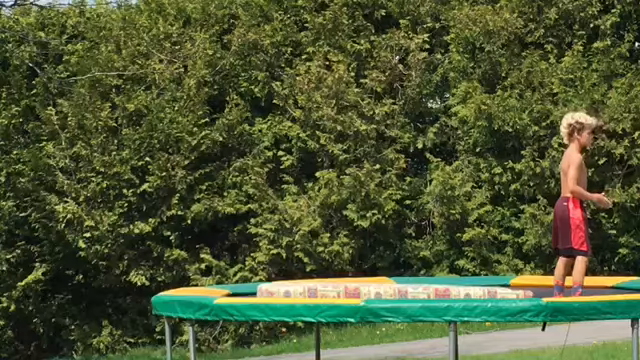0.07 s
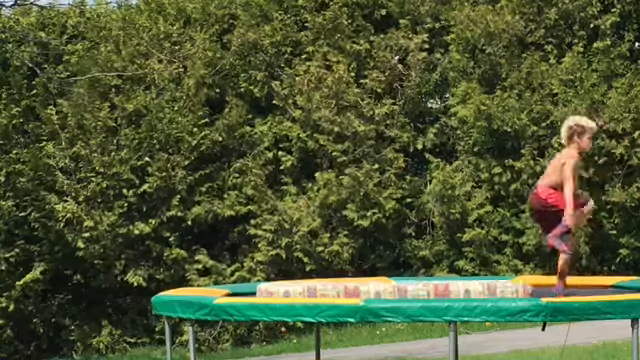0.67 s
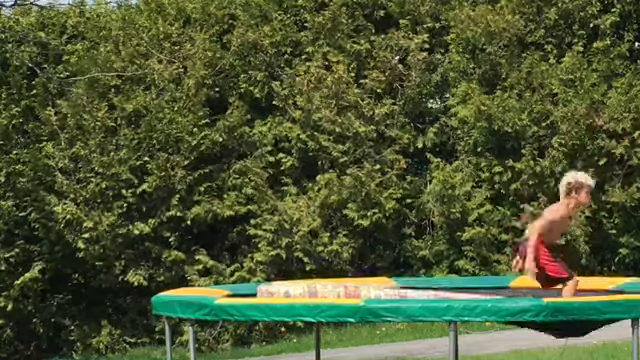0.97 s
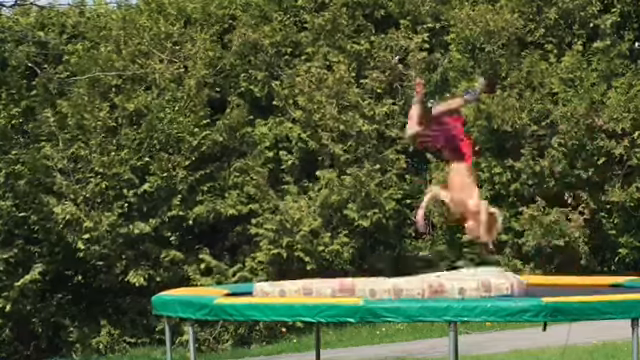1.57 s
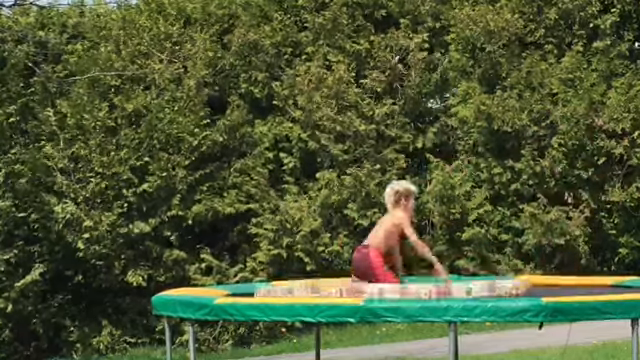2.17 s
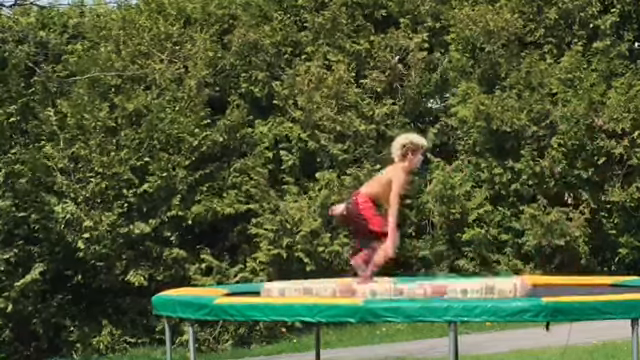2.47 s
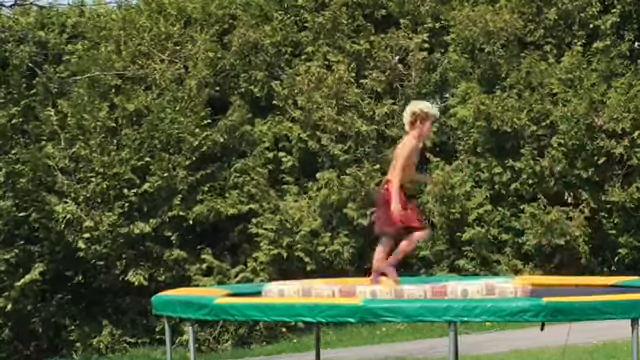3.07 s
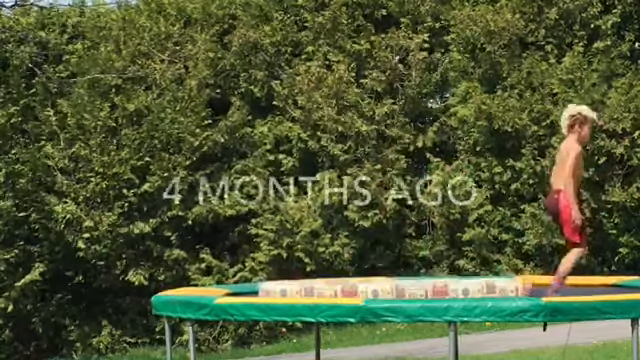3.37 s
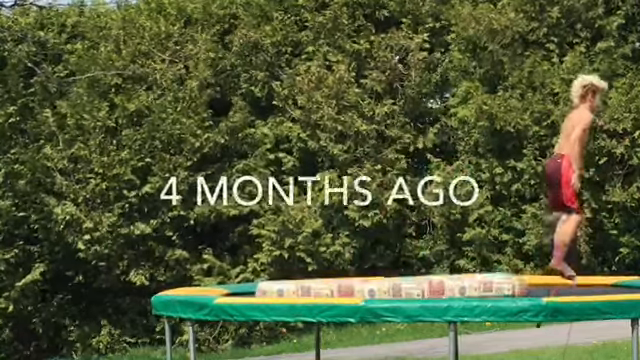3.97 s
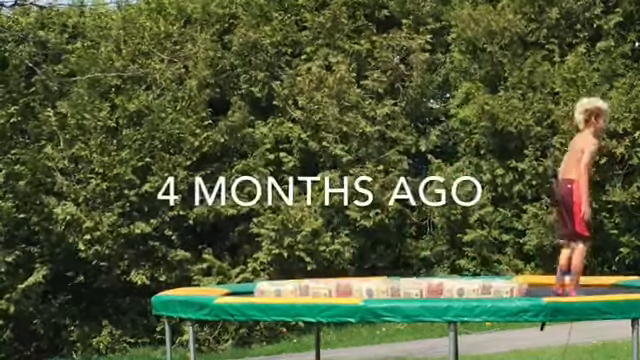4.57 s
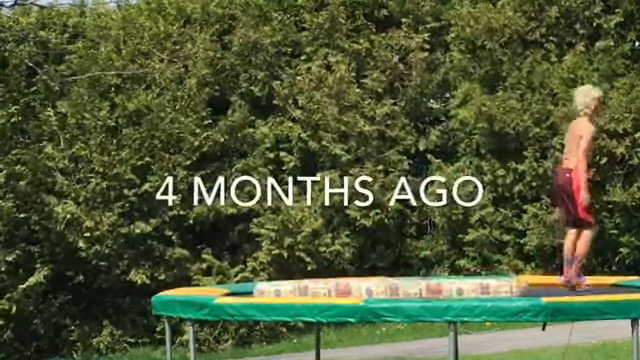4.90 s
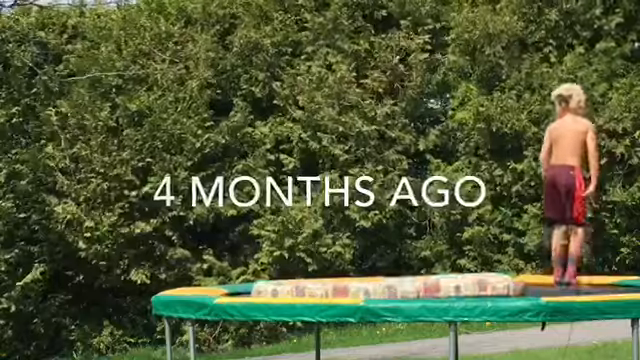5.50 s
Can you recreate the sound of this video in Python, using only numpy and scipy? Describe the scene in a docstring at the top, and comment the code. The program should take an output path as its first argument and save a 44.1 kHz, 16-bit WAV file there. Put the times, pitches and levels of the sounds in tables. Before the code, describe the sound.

A garden trampoline is heard from a few metres away, over low gusting wind, a distant droning engine, a faint machine hum, far traffic and softly hissing leaves. After a faint creak at 0.6 seconds, the steel springs rasp and squeak in a quick run from 1.1 to 1.7 seconds, thin and ringing with a slight echo. The mat gives a light pat at 1.8 seconds and a deep thump at 1.9, followed by more creaks and pats until 2.7. Very faint bird chirps come around 3 and 5 seconds, and all sound dips for an instant at 3.2. A softer thump lands at 3.7 seconds. The engine drone, now lower, swells between 4 and 5 seconds under scattered creaks and a light pat. From 5.1 to 5.5 seconds comes a cluster of deep, hollow thumps with brief creaks, the loudest at 5.4.

```python
"""Steel springs rasp and ring as a child bounces and flips on a garden trampoline some metres away. The springs
stick and slip on their hooks; the mat gives light pats and dull thumps that fall in pitch. A few birds chirp
from the hedge behind, which also echoes the springs. In the background are a droning engine, a humming machine,
wind, far traffic and a soft hiss. The whole sound dips briefly once."""
import sys
import numpy as np
from scipy import signal
from scipy.fft import rfft, irfft
from scipy.io import wavfile
from scipy.ndimage import uniform_filter1d

SR = 44100
rng = np.random.default_rng(int(sys.argv[2]) if len(sys.argv) > 2 else 0)


def put_to_file(sound):
    """Save the sound as 16-bit audio at rate SR, in the file named by the first command-line argument."""
    columns = np.atleast_2d(sound).T  # one column per channel
    safe = np.clip(columns, -1, 1)
    whole_steps = np.round(safe * 32767)
    wavfile.write(sys.argv[1], SR, whole_steps.astype(np.int16))


N = 244314
TIME = np.arange(N) / SR

# Each slip of a spring on its hook: start_s, length_s, strength_db
SPRING_SLIPS = [(.575, 0.083, -70), (1.071, .047, -66.5), (1.124, 0.054, -58.5), (1.16, .02, -57),
                (1.283, 0.054, -60), (1.35, 0.033, -59), (1.459, .028, -62), (1.945, .006, -59.5),
                (2.007, 0.1, -66.5), (2.092, 0.048, -60.5), (2.227, 0.042, -52.5), (2.277, .043, -59),
                (2.405, 0.051, -57), (2.711, .037, -66), (3.095, 0.034, -65), (3.598, 0.13, -68.5),
                (3.779, 0.03, -64.5), (4.024, 0.026, -65), (4.39, 0.089, -66), (4.581, 0.024, -57.5),
                (4.62, 0.12, -64.5), (5.369, 0.029, -59.5), (5.478, .03, -65)]
# The tone of the rasp: frequency_hz, gain_db
RASP_TONE = [(1200, -13), (2300, 3), (2850, -40), (3300, -11), (4300, 0.5), (5100, -3), (7000, -7.5),
             (8300, -15), (9300, -23), (10400, -10.5), (11700, -9), (13600, -16), (14800, -23)]
# The notes a coil rings at, in three groups (narrow ones ring longer): pitch_hz, width_hz, gain_db
MAIN_NOTES = [(3940, 110, 0), (4070, 78, 2.5), (4460, 43, 6.5), (5070, 50, -4), (6600, 95, -32),
              (7560, 65, -16.5)]
LOW_NOTES = [(3240, 10, -9), (3270, 18, 1.5), (3560, 140, -8.5)]
HIGH_NOTES = [(9080, 35, -4), (9220, 39, 3), (9420, 130, -5), (9750, 110, -3)]


def spring_creaks(clicks_per_s=3400, uneven_db=2.5, rise_s=0.0025, release_s=0.013, detune=0.015):
    """Hooks stick and slip: a shower of tiny clicks rasps and rings the coils, no two quite alike."""
    out, t = np.zeros(N), np.arange(SR // 2) / SR
    for start_s, length_s, strength_db in SPRING_SLIPS:
        spikes = amp(uneven_db * np.minimum(rng.exponential(1, len(t)), 3))
        sizes = spikes * rng.standard_normal(len(t))
        envelope = (1 - np.exp(-t / rise_s)) * np.exp(-np.maximum(t - length_s, 0) / release_s)
        clicks = envelope * sizes * (rng.random(len(t)) < clicks_per_s / SR)
        rasp = amp(strength_db - 1) * unit(colour(clicks, RASP_TONE))
        main = amp(strength_db - 5) * coil_ring(clicks, MAIN_NOTES, detune)
        force_db = strength_db + 60  # 0 for a firm slip; softer ones lose less low ring than rasp
        low = amp(-65.5 + 0.75 * force_db) * coil_ring(clicks, LOW_NOTES, detune)
        high = amp(-68.5 + force_db) * coil_ring(clicks, HIGH_NOTES, detune / 2)
        length_gain = np.sqrt(np.mean(envelope ** 2))  # longer slips carry more energy
        add(out, start_s, length_gain * (rasp + main + low + high))
    return out


def coil_ring(clicks, notes, detune):
    """Every click sets off the coil's fading notes, all tuned up or down by one random amount."""
    t = np.arange(SR // 4) / SR
    tuning = 1 + detune * rng.standard_normal()
    ring = sum(amp(db) * width_hz * np.exp(-np.pi * width_hz * t) * np.sin(2 * np.pi * hz * tuning * t)
               for hz, width_hz, db in notes)
    return unit(signal.oaconvolve(clicks, ring)[:len(clicks)])


# Each squeal of a hook: start_s, pitch_hz, strength_db
HOOK_SQUEALS = [(1.127, 3400, -55), (1.168, 3260, -48.5), (1.35, 3275, -61), (1.65, 3540, -61),
                (2.005, 3250, -63), (2.25, 3244, -55), (2.49, 3260, -65)]


def spring_squeals(waver=0.013, flutter_db=2.0, rise_s=0.0057, halving_s=0.039, decay_s=0.39):
    """A hook slips in step with its coil's low ring: a shaky tone that fades fast, then lingers."""
    out, t = np.zeros(N), np.arange(SR) / SR
    envelope = (1 - np.exp(-t / rise_s)) * np.exp(-t / decay_s) / (1 + t / halving_s)
    for start_s, pitch_hz, strength_db in HOOK_SQUEALS:
        phase = phase_of(pitch_hz * (1 + waver * drift(98)[:SR]))
        gain = np.sqrt(2) * amp(strength_db + flutter_db * drift(60)[:SR])
        add(out, start_s, gain * envelope * np.sin(phase))
    return out


# Each deep thump of the mat: start_s, boom_db, boom_hz, knock_hz
MAT_THUMPS = [(1.942, -23.5, 61.3, 234), (3.695, -28.5, 58, 149), (5.15, -31, 59.93, 149),
              (5.191, -23.5, 69.4, 175), (5.3687, -15.5, 101.5, 197), (5.392, -27.5, 59.7, 159),
              (5.465, -30, 86.6, 170.3)]


def mat_thumps(hard_thump_db=-15.5):
    """The whole mat booms under a hollow knock; the harder the thump, the louder and shorter the knock."""
    out, t = np.zeros(N), np.arange(SR // 4) / SR
    for start_s, boom_db, boom_hz, knock_hz in MAT_THUMPS:
        softer_db = max(hard_thump_db - boom_db, 0)
        knock_db = -13.5 - 1.76 * softer_db
        knock = amp(knock_db) * falling_tone(t, knock_hz, rise_cycles=0.33 + 0.21 * softer_db, sag=0.069)
        boom = amp(boom_db) * falling_tone(t, boom_hz, rise_cycles=0.68, sag=0.12)
        add(out, start_s, knock + boom)
    return out


# Each light pat on the mat and its padding: start_s, knock_db, slap_db
MAT_PATS = [(1.76, -33, -56), (1.946, -34.5, -39.5), (2.1322, -36, -41.5), (2.6247, -37, -44),
            (3.672, -30.5, -40.5), (4.4536, -40, -66), (4.471, -37, -66), (5.2555, -38.5, -56),
            (5.3484, -37.5, -62)]
# The tone of the slap: frequency_hz, gain_db
SLAP_TONE = [(300, -20), (900, -3), (1600, 0), (2200, -8), (2900, -23), (4200, -26), (6000, -33),
             (14000, -48)]


def mat_pats(knock_hz=417, slap_rise_s=0.0021):
    """A light touch makes a small slap of noise and a short knock, always at the same hollow pitch."""
    out, t = np.zeros(N), np.arange(SR // 4) / SR
    for start_s, knock_db, slap_db in MAT_PATS:
        noise = unit(colour(rng.standard_normal(len(t)), SLAP_TONE))
        slap = amp(slap_db) * noise * swell(t / slap_rise_s)
        knock = amp(knock_db) * falling_tone(t, knock_hz, rise_cycles=1.08, sag=0.064)
        add(out, start_s, slap + knock)
    return out


# Each bird chirp: start_s, first_pitch_hz, level_db
BIRD_CHIRPS = [(2.904, 4670, -64.5), (3.034, 4067, -69), (5.034, 4780, -63.5)]


def birds(length_s=0.048, end_pitch_ratio=0.76, warble=0.051):
    """Birds in the hedge give thin, warbling chirps that slide down in pitch."""
    out, flutter, count = np.zeros(N), drift(280), int(length_s * SR)
    slide = np.geomspace(1, end_pitch_ratio, count)
    envelope = np.sqrt(2) * signal.windows.tukey(count, 0.5)
    for start_s, first_pitch_hz, level_db in BIRD_CHIRPS:
        pitch_hz = first_pitch_hz * slide * (1 + warble * flutter[int(start_s * SR):][:count])
        add(out, start_s, amp(level_db) * envelope * np.sin(phase_of(pitch_hz)))
    return out


def hedge_echoes(sound, fade_s=0.42, echoes_per_s=2000, gap_s=0.004):
    """Sound scatters off the hedge and the ground as many tiny echoes that die away."""
    t = np.arange(SR // 2) / SR
    echoes = rng.standard_normal(len(t)) * (rng.random(len(t)) < echoes_per_s / SR)
    echoes *= amp(-60 * t / fade_s) * (t > gap_s)
    return signal.oaconvolve(sound, echoes / np.linalg.norm(echoes))[:N]


# The engine's drone, slowly rising in pitch, then lower from 3.2 s on: time_s, firing_hz, strength_db
ENGINE_EARLY = [(0.14, 78.67, -40.5), (0.42, 78.92, -44.5), (2.49, 83.65, -45.5), (2.8, 85.2, -47)]
ENGINE_LATE = [(3.22, 60.6, -44), (3.32, 65.1, -42), (3.436, 65.3, -60), (3.488, 64.86, -40),
               (4.034, 66.7, -42.5), (4.072, 66.34, -33.5), (4.526, 68.17, -36.5), (4.78, 67.8, -39.5),
               (4.85, 67.3, -34), (4.976, 59.9, -46), (5.12, 60.2, -45)]
# How loud its octave is next to its main note: time_s, gain_db
ENGINE_OCTAVE = [(0, -16.5), (1.2, -8.5), (2.3, -13), (3.4, -29)]


def far_engine(waver=0.01198, throb_db=1.7):
    """An engine fires so quickly that it drones: one note, plus the note an octave above."""
    track = np.vstack([ENGINE_EARLY, ENGINE_LATE])
    phase = phase_of(curve(track) * (1 + waver * drift(10.7)))
    gain = np.sqrt(2) * amp(curve(track, column=2) - 1.5 + throb_db * drift(5.9))
    return gain * (np.sin(phase) + amp(curve(ENGINE_OCTAVE)) * np.sin(2 * phase))


# How the machine's hum grows and fades: time_s, strength_db
HUM_LEVELS = [(0, -56), (1.4, -50.5), (2.2, -58.5), (4.1, -53.5), (4.6, -68)]


def far_machine(pitch_hz=227, waver=0.02396, throb_db=1.7):
    """A far machine hums faintly on one slightly wavering note."""
    gain = np.sqrt(2) * amp(curve(HUM_LEVELS) - 2 + throb_db * drift(6.5))
    return gain * np.sin(phase_of(pitch_hz * (1 + waver * drift(6.24))))


# The tone of each background noise: frequency_hz, gain_db
WIND_TONE = [(18, -43), (30, -7.5), (45, 5), (58, 4), (90, 4), (135, -8), (180, -5.5), (260, -10),
             (350, -12), (500, -24), (900, -49)]
TRAFFIC_TONE = [(200, -21), (480, -7), (620, -2), (780, -0.5), (920, 2), (1200, -1.5), (1600, -5.5),
                (2100, -10), (2500, -17), (2900, -32), (4500, -54)]
HISS_TONE = [(1500, -1), (2600, -0.5), (2950, -4.5), (3300, 0), (4300, -2), (4900, -5.5), (6100, -3.5),
             (7700, -9), (9300, -8), (10300, -15.5), (11400, -13), (15600, -43)]
# How loud each one is over time: time_s, level_db
WIND_LEVELS = [(0, -46.5), (3.5, -44)]
TRAFFIC_LEVELS = [(0, -52), (4, -50)]
HISS_LEVELS = [(0, -68.5), (1, -67), (2.6, -62), (5.54, -61.6)]


def wind_traffic_hiss(gust_db=1.5, flicker_db=0.14):
    """Wind rumbles in gusts, far traffic roars and a soft hiss grows."""
    wind = amp(curve(WIND_LEVELS) + gust_db * drift(4.6)) * patchy_noise(WIND_TONE, -0.5)
    traffic = amp(curve(TRAFFIC_LEVELS) + flicker_db * drift(36)) * patchy_noise(TRAFFIC_TONE, 1.22)
    hiss = amp(curve(HISS_LEVELS)) * patchy_noise(HISS_TONE, 1.93)
    return wind + traffic + hiss


def patchy_noise(tone, patch_db):
    """Noise with the given tone, whose lows and highs grow and fade in random patches."""
    _, _, grid = signal.stft(rng.standard_normal(N), SR, nperseg=1024, noverlap=768)
    patches = uniform_filter1d(rng.standard_normal(grid.shape), size=9, axis=0)  # blur over frequency
    patches = unit(uniform_filter1d(patches, size=9, axis=1))  # and over time
    _, noise = signal.istft(grid * amp(patch_db * patches), SR, nperseg=1024, noverlap=768)
    return unit(colour(noise[:N], tone))


def falling_tone(t, pitch_hz, rise_cycles, sag):
    """A short tone that swells and dies while its pitch sinks."""
    cycles = pitch_hz * t
    return swell(cycles / rise_cycles) * np.sin(2 * np.pi * np.log1p(sag * cycles) / sag)


def swell(progress):
    """Rises smoothly to 1 when progress is 1, then dies away."""
    return progress * np.exp(1 - progress)


def drift(rate_hz):
    """A smooth random wobble of typical size 1; a higher rate wobbles faster."""
    hz = np.fft.rfftfreq(N, 1 / SR)
    return unit(irfft(rfft(rng.standard_normal(N)) / (1 + (hz / rate_hz) ** 4), N))


def colour(sound, tone):
    """Turns a sound's frequencies up or down to follow a tone table."""
    frequency_hz, gain_db = np.transpose(tone)
    hz = np.fft.rfftfreq(len(sound), 1 / SR)
    gain = amp(np.interp(np.log(hz + 1), np.log(frequency_hz), gain_db))
    return irfft(rfft(sound) * gain, len(sound))


def curve(rows, column=1):
    """Joins a time table's points with straight lines, holding the end values."""
    rows = np.asarray(rows)
    return np.interp(TIME, rows[:, 0], rows[:, column])


def phase_of(pitch_hz):
    """Turns a changing pitch into the angle of a sine wave."""
    return 2 * np.pi * np.cumsum(pitch_hz) / SR


def amp(db):
    """Turns decibels into a gain."""
    return 10 ** (np.asarray(db) / 20)


def unit(sound):
    """Scales a sound to an average power of 1."""
    return sound / np.sqrt(np.mean(sound ** 2) + 1e-20)


def add(mix, start_s, sound):
    """Mixes a sound in at its start time."""
    part = mix[max(round(start_s * SR), 0):][:len(sound)]
    part += sound[:len(part)]


def scene():
    """Springs and birds with their echoes, the mat, and the garden's background, in one channel."""
    bright = spring_creaks() + spring_squeals() + birds()
    garden = bright + amp(-8.5) * hedge_echoes(bright) + mat_thumps() + mat_pats()
    return (garden + far_engine() + far_machine() + wind_traffic_hiss())[None]


def record(dry, fade_start_s=0.085, fade_s=0.058, dip_at_s=3.184, dip_half_s=0.033, cutoff_hz=15720):
    """The sound fades in, dips briefly once and loses its very highest treble."""
    fade = np.clip((TIME - fade_start_s) / fade_s, 0, 1)
    dip = np.clip(abs(TIME - dip_at_s) / dip_half_s, 0.065, 1)
    low_pass = signal.firwin(2047, cutoff_hz, window=("kaiser", 9), fs=SR)
    return signal.oaconvolve(dry * fade * dip, low_pass[None], "same")


dry = scene()
out = record(dry)
put_to_file(out)
```